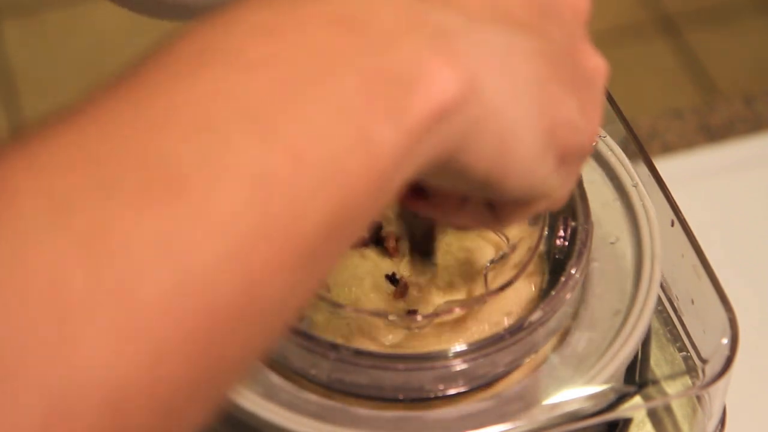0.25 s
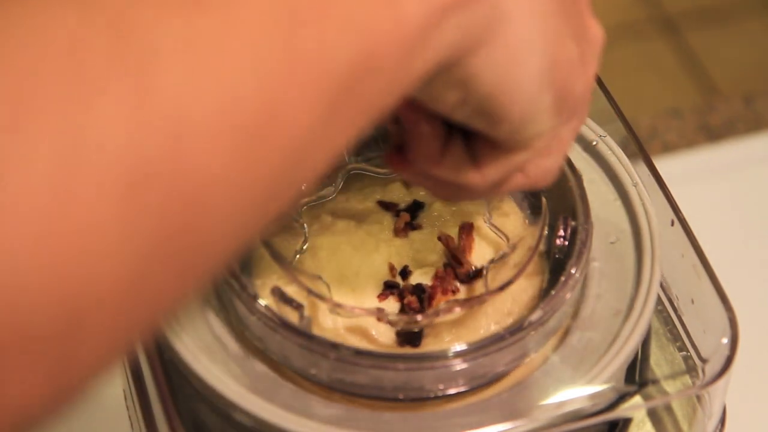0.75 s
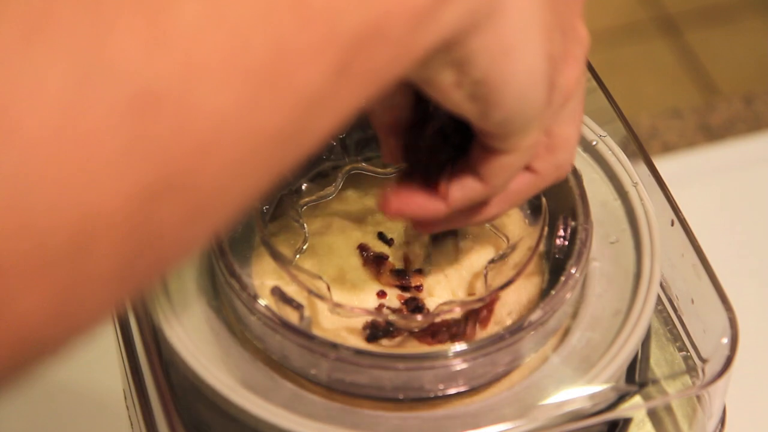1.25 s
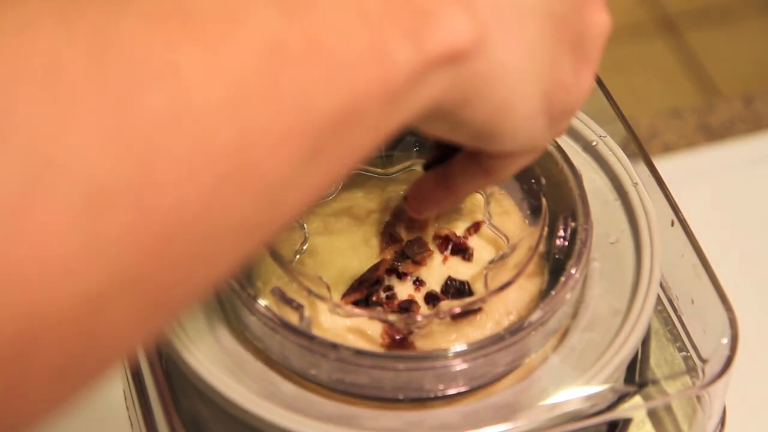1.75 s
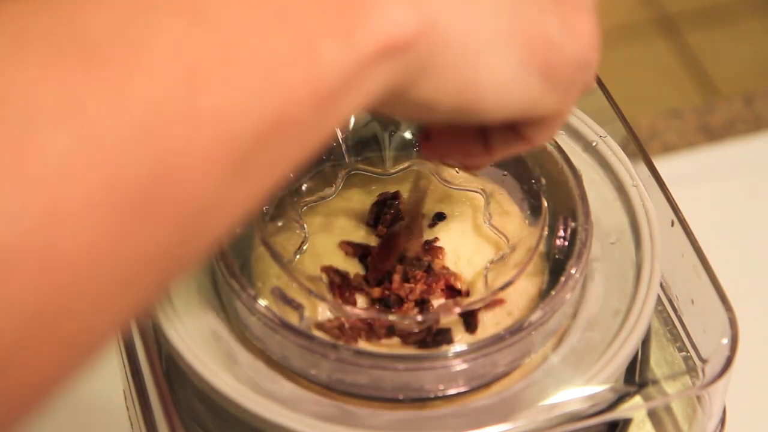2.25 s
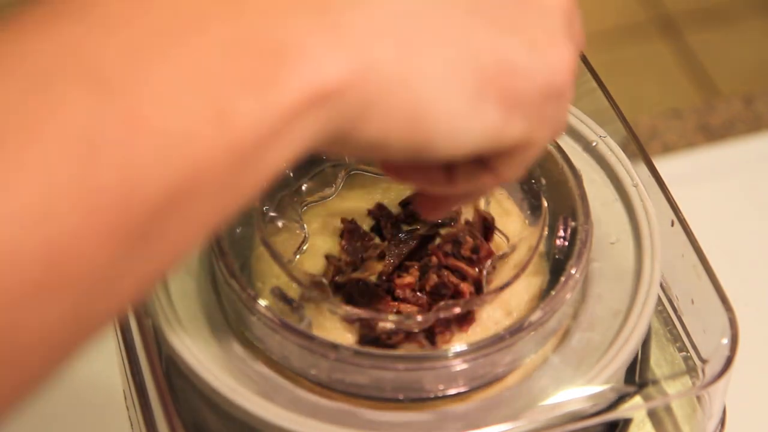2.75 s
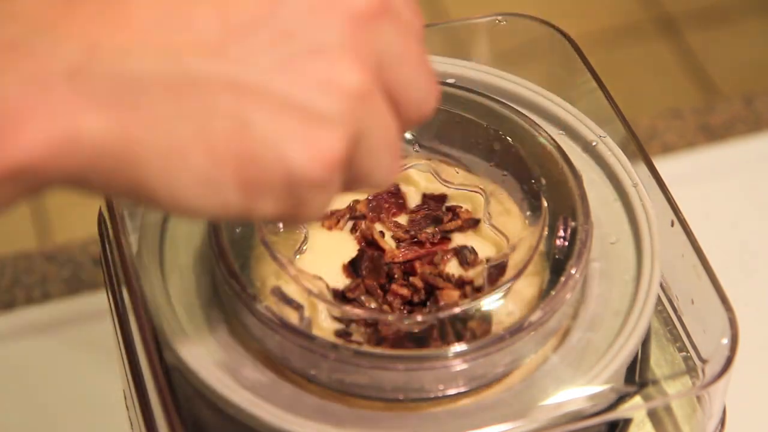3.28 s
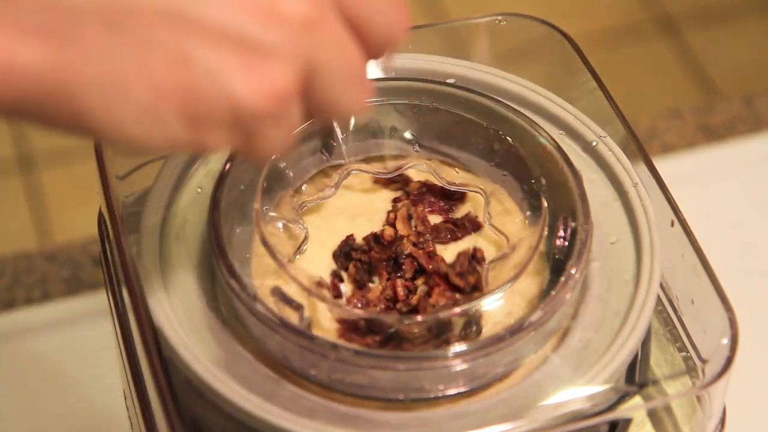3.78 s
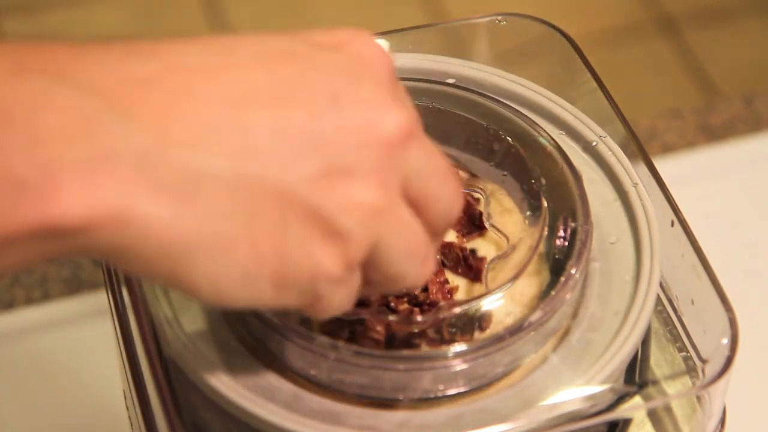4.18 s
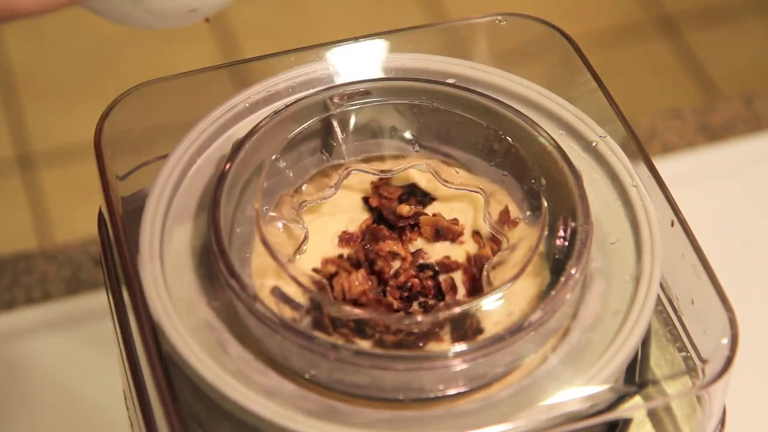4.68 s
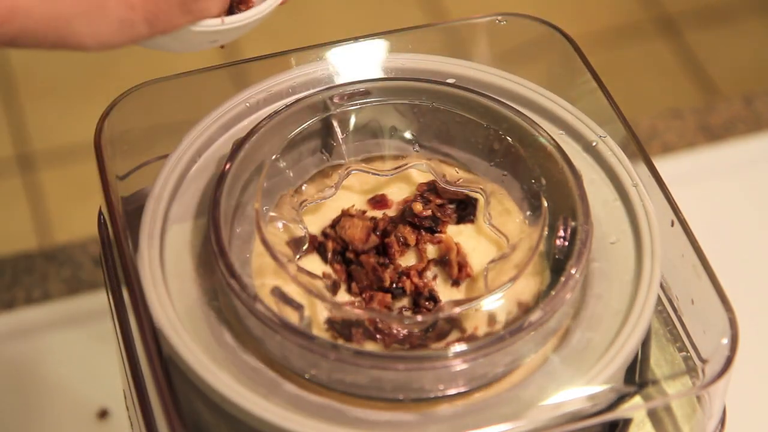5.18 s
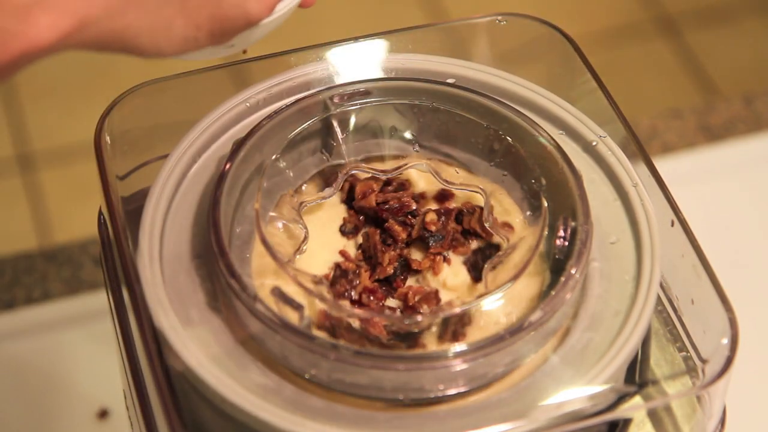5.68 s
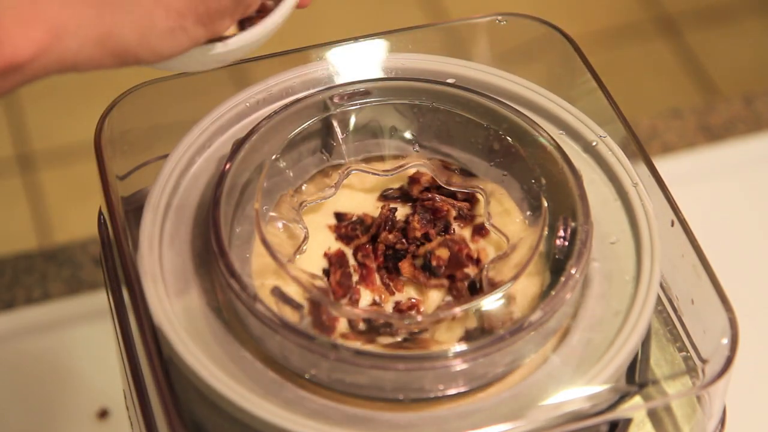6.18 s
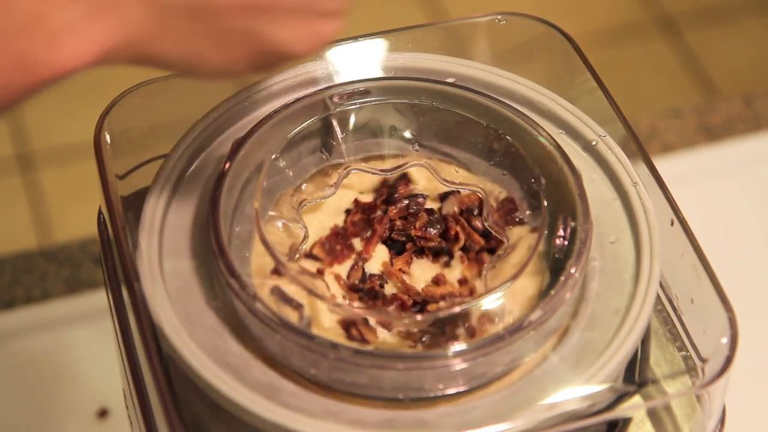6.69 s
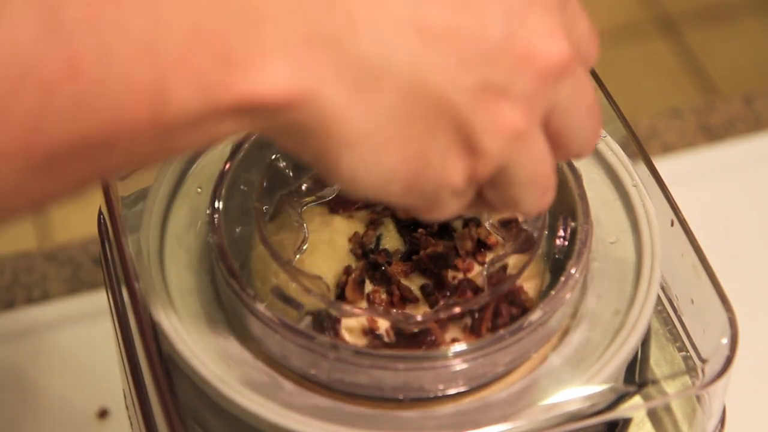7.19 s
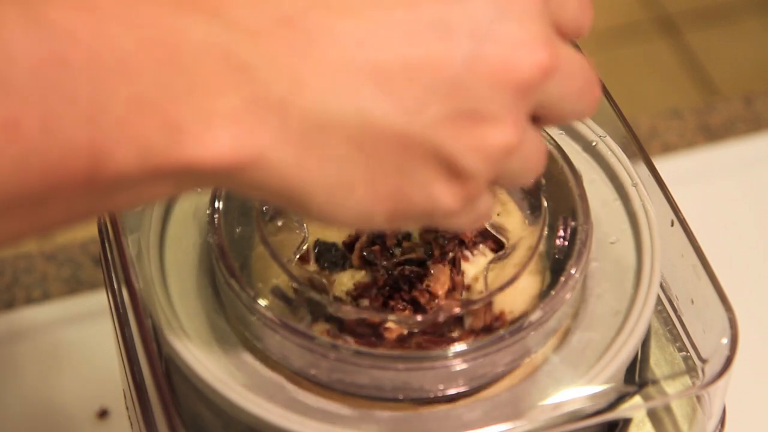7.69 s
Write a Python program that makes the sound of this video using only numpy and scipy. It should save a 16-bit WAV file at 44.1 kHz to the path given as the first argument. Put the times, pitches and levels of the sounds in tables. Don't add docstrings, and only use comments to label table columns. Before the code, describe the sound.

Steady whirring of a small churning machine heard close up indoors. The gear tone flutters slightly with wheel turns, while the plastic body buzzes and rattles. Fine hiss and irregular brittle ticks come from the frozen bowl. Soft low thuds pass about every two and a half seconds, each followed by a small catch in the whine. Crumbs patter once around the middle; the colour shifts subtly as something moves above.

```python
import sys
import numpy as np
from scipy import signal
from scipy.fft import rfft, irfft
from scipy.io import wavfile
from scipy.ndimage import uniform_filter1d

SR = 44100
rng = np.random.default_rng(int(sys.argv[2]) if len(sys.argv) > 2 else 0)


def boost(x):
    u = np.asarray(x, float) / 20
    return 10 ** u


def master(y):
    cut = np.clip(np.atleast_2d(y).T, -1, 1)
    pcm = np.round(cut * 32767)
    wavfile.write(sys.argv[1], SR, pcm.astype(np.int16))


N = 350154
T = np.arange(N) / SR
TEETH, PULL_HZ = 7, 120
MESH_HZ, WHEEL_HZ, BOWL_HZ = 396.68, 3.42, .425
# (level_db, db_per_unit_load)
WHINE, DRONE, RATTLE, SCRAPE = (-19.5, 0.73), (-20, -0.27), (-27.5, -0.39), (-42.5, -0.39)


def evened(x):
    return x / np.sqrt(np.mean(x ** 2) + 1e-20)


def cycle(turns):
    return np.cos(2 * np.pi * turns)


def slow(rate_hz):
    step = 64
    count = N // step + 2
    hz = np.fft.rfftfreq(count, step / SR)
    z = rfft(rng.standard_normal(count)) * np.exp(-(hz / rate_hz) ** 2)
    return np.interp(T, np.arange(count) * step / SR, evened(irfft(z, count)))


def patchwork(shape, frames, bins):
    over_time = uniform_filter1d(rng.standard_normal(shape), size=frames, axis=0)
    return evened(uniform_filter1d(over_time, size=bins, axis=1))


def colour(x, spectrum, rings):
    hz = np.fft.rfftfreq(16384, 1 / SR)
    f, db = np.transpose(spectrum)
    gain = boost(np.interp(np.log(hz + 1), np.log(f + 1), db))
    for centre, width, up_db in rings:
        hump = (boost(2 * up_db) - 1) / (1 + (2 * (hz - centre) / width) ** 2)
        gain = gain * np.sqrt(1 + hump)
    fold = irfft(np.log(np.maximum(gain, 1e-6)))
    fold[1:8192] *= 2
    fold[8193:] = 0
    return signal.oaconvolve(x, irfft(np.exp(rfft(fold)))[:8192])[:N]


def split(x, hz, kind):
    return signal.sosfilt(signal.butter(4, hz, kind, fs=SR, output="sos"), x)


# start_s, load [-1.2..1]
LOAD = [
    (0, 0.46),
    (1.3, 1),
    (2.8, 0.32),
    (3.6, -0.55),
    (4.6, -1.2),
    (5.5, -1.1),
    (6.7, -0.62),
    (7.94, 0.46),
]


def level(layer):
    base_db, db_per_load = layer
    load = np.interp(T, *np.transpose(LOAD))
    return boost(base_db + db_per_load * load)


# times_per_turn, swing_hz, start_turns
WOBBLE = [(1, .46, .06), (2, .4, 0), (3, .7, .575), (5, .45, .51), (6, .35, .98)]


def tooth_rate():
    rocking = sum(hz * cycle(k * WHEEL_HZ * T + start) for k, hz, start in WOBBLE)
    bowl_hz = .28 * cycle(BOWL_HZ * T + .06)
    catch_hz = -2.5 * catches()
    return MESH_HZ + rocking + bowl_hz + catch_hz


def tooth_level():
    wheel_db = .55 * cycle(2 * WHEEL_HZ * T + .36)
    bowl_db = .45 * cycle(BOWL_HZ * T - .25)
    catch_db = 3 * catches()
    return level(WHINE) * boost(wheel_db + bowl_db + catch_db)


# shaft_multiple, pull_multiple, level_db
TONES = [(1, 0, -59), (0, 1, -52), (7, -2, -55), (0, 2, -58), (5, 0, -57), (0, 3, -40), (0, 4, -45),
         (7, 1, -30), (12, -1, -37), (8, 1, -39), (13, -1, -39), (11, 0, -38), (7, 2, -37), (14, -1, -26),
         (13, 0, -35), (14, 0, -26), (15, 0, -33), (7, 4, -42), (18, -1, -42), (21, -2, -41), (18, 0, -42),
         (19, 0, -46), (17, 1, -50), (18, 1, -46), (21, 0, -47), (19, 1, -49), (18, 2, -52), (28, 1, -52),
         (42, -1, -45), (56, 0, -45),
         (23, 0, -50), (28, 0, -49), (35, 0, -53), (55, 0, -49), (57, 0, -47), (63, 0, -52)]


def whine(shaft, pull, waver_db=1.5, tones_db=0.2):
    out = tooth_level() * boost(0.59 * slow(36.0)) * cycle(TEETH * shaft)
    for order, pulls, db in TONES:
        waver = min(order, 7) / 7
        wander = 0.021 * order ** .5 * slow(3.1)
        loudness = boost(db + tones_db + waver * waver_db * slow(4.9))
        out += loudness * cycle(order * shaft + pulls * pull + rng.random() + wander)
    return np.sqrt(2) * out


# pitch_hz, level_db
FRIDGE = [(58.54, -61), (360.8, -44), (157.5, -56), (221.4, -52), (755.7, -40), (820.3, -43), (950.8, -44)]
BEAT_STARTS = [.14, .9]


def fridge():
    starts = [*BEAT_STARTS, *rng.random(5)]
    hums = sum(boost(db) * cycle(hz * T + start) for (hz, db), start in zip(FRIDGE, starts))
    return np.sqrt(2) * hums


# pitch_hz, density_db [dB per Hz]
HOUSING = [(30, -63), (90, -39), (170, -30.5), (260, -37.5), (420, -25), (510, -16), (680, -14.5),
           (850, -18), (1060, -27), (1400, -31), (1800, -29), (3000, -29.5), (5000, -40), (5600, -44.5),
           (7000, -81.5)]
# pitch_hz, width_hz, rise_db
PANELS = [(193.5, 33, 10), (288, 38, 6.5), (317, 15, -0.5), (356, 25, 7.5), (494, 17, 6), (560, 19, 5.5),
          (595, 31, -2), (678, 33, 8), (740, 21, 2), (809, 26, 4.5), (849, 14, 6), (953, 45, 5.5),
          (1395, 140, 7.5), (1576, 18, 9), (2226, 69, 8), (2265, 9.3, 7), (2300, 40, -13), (2566, 48, 6),
          (3215, 57, 11), (3378, 59, 8.5), (3545, 69, 5.5), (3828, 40, 10), (4050, 51, 15.5),
          (4256, 20, 10), (4480, 30, 11.5), (4703, 93, 10), (4947, 71, 12.5), (5245, 79, 7)]


def rattle(shaft, pull, repeat=0.47, loose=0.94, rub=0.72, burst_db=1.2, pinion=0.52):
    teeth = TEETH * shaft + 0.16 * cycle(pull)
    at = np.flatnonzero(np.diff(np.floor(teeth)) > 0)
    knocks, turns = np.zeros((2, N))
    around = TEETH * 17
    wheel = rng.standard_normal(around)[np.arange(len(at)) % around]
    knocks[at] = repeat * wheel + loose * rng.standard_normal(len(at))
    sliding = rng.standard_normal(N) * (1 + 0.39 * cycle(teeth)) * (1 + 0.7 * cycle(pull))
    body = colour(evened(knocks) + rub * sliding, HOUSING, PANELS)
    drone = split(body, 1384, "low")
    drone = drone / np.std(split(drone, 620, "high"))
    drone = drone * level(DRONE) * boost(-6.0 + 1.1 * slow(2.7))

    turns[np.flatnonzero(np.diff(np.floor(shaft + .004 * slow(6.))) > 0)] = 1
    spread = evened(rng.standard_normal(700)) / np.sqrt(700)
    smear = signal.oaconvolve(evened(turns), spread)[:N]
    chatter = rng.standard_normal(N) * (1 + .2 * cycle(teeth)) * boost(burst_db * slow(50.))
    chatter = chatter * (1 + .09 * cycle(6 * WHEEL_HZ * T - .46))
    panels = split(colour(chatter + pinion * smear, HOUSING, PANELS), 1350, "high")
    return drone + evened(panels) * level(RATTLE) * boost(-0.54)


# start_s, arm_low [-1..1.1], dish_beside [0..1]
NEAR = [(0, 0.59, 0.6), (.5, 0.8, .9), (.9, 0.48, 0), (1.6, 1.06, 0), (2.1, 1.1, 0), (2.7, 0.94, 0.2),
        (3.1, .2, 0), (3.5, -0.41, 0), (4.5, -0.33, 0.1), (5, -0.96, 0.38), (6, -0.36, 0.16),
        (6.5, -0.78, 0.26), (7.94, -0.65, 0)]
# pitch_hz, change_db
ARM_TINT = [(565, 0.5), (630, 0.5), (740, -2.5), (790, 2.5), (1000, 1), (1200, 0), (1600, 0), (2230, 1),
            (2560, -1), (3000, -1), (3170, 2), (3550, -0.5), (4300, -1), (5300, 1)]
# pitch_hz, change_db
DISH_TINT = [(600, 0), (740, 3), (793, -6.5), (850, 1), (1000, 2), (1190, -1), (1600, -1.5), (2230, 2.5),
             (2800, -2.5), (3250, -5.5), (3700, 1), (4500, 1.5)]


def shaded(x, flicker_db=1.2):
    hz, t, z = signal.stft(x, SR, nperseg=4096)
    start_s, arm, dish = np.transpose(NEAR)
    db = flicker_db * patchwork(z.T.shape, 4, 12).T * (hz > 1250)[:, None]
    for tint, near in ((ARM_TINT, arm), (DISH_TINT, dish)):
        pitch_hz, change_db = np.transpose(tint)
        tint_db = np.interp(np.log(hz + 1), np.log(pitch_hz), change_db)
        db = db + np.outer(tint_db, np.interp(t, start_s, near))
    return signal.istft(z * boost(db), SR, nperseg=4096)[1][:N]


# pitch_hz, density_db [dB per Hz]
HISS = [(4000, -30), (5400, 0), (6500, -1), (8000, -4.5), (10000, -6), (12000, -6.5), (13500, -8),
        (14500, -11.5), (15700, -16)]
# pitch_hz, width_hz, rise_db
HISS_RINGS = [(5805, 60, 6), (6280, 100, 4.5), (7330, 60, 3), (7700, 200, 4), (10360, 170, 7)]
# pitch_hz, change_db
HISS_TINT = [(5700, 1), (6100, -.6), (6500, 1), (7600, -1.5), (8250, 0), (9600, -0.5), (11000, -1),
             (13500, 0)]


def scrape(shaft, pull, grains_per_s=90., spread_db=0.0, grain_share=0.47, patch_db=0.5):
    throb = (1 + 0.11 * cycle(pull)) * (1 + .12 * cycle(TEETH * shaft)) * (1 + .07 * cycle(shaft))
    throb = throb * (1 + .09 * cycle(6 * WHEEL_HZ * T - .29)) * boost(1.5 * slow(45.))
    sizes = boost(spread_db * np.minimum(rng.exponential(1, N), 3))
    sizes = sizes * (rng.random(N) < grains_per_s / SR)
    fade_s = 0.0038
    grains = signal.lfilter([1], [1, -np.exp(-1 / (fade_s * SR))], sizes) * rng.standard_normal(N)
    grains = split(grains, 7200, "high")
    source = throb * rng.standard_normal(N) + grain_share * evened(grains)
    hiss = colour(source, HISS, HISS_RINGS)
    hz, t, z = signal.stft(hiss, SR, nperseg=256)
    patches = patchwork(z.T.shape, 6, 14).T
    arm = np.interp(t, *np.transpose(NEAR)[:2])
    arm_db = np.outer(np.interp(hz, *np.transpose(HISS_TINT)), arm)
    hiss = signal.istft(z * boost(patch_db * patches + arm_db), SR, nperseg=256)[1][:N]
    return evened(hiss) * level(SCRAPE) * boost(-0.34)


# start_s, peak_db
TICKS = [(0.5836, -32), (0.9188, -36), (1.1243, -39), (1.4177, -30), (1.5599, -31), (1.5933, -35),
         (1.7519, -32), (1.9999, -38), (2.2253, -33), (2.4024, -31), (2.5341, -36), (2.5845, -38),
         (2.9836, -31), (3.0603, -29), (3.1248, -36), (3.3189, -38), (3.3648, -37), (3.6466, -38),
         (4.5306, -37), (4.8304, -37), (4.8768, -33), (5.036, -30), (5.2614, -36), (5.461, -34),
         (5.7942, -31), (6.095, -36), (6.2901, -36), (6.8598, -39), (7.2604, -38), (7.8366, -32)]


def ticks(t60=0.031):
    faint_per_s, faint_db = 3, -40
    low_db, low_share = -43.5, .3
    top, low = np.zeros((2, N))
    faint = np.flatnonzero(rng.random(N) < faint_per_s / SR) / SR
    for s, db in [*TICKS, *[(s, faint_db) for s in faint]]:
        i = round(s * SR)
        top[i] = boost(db)
        low[i] = boost(low_db + low_share * (db + 35))
    fade = [1, -boost(-60 / (t60 * SR))]
    noise = rng.choice([-1., 1.], (2, N))
    bright = split(signal.lfilter([1], fade, top) * noise[0], 14000, "high")
    bright = split(bright, 14400, "low")
    lower = split(signal.lfilter([1], fade, low) * noise[1], 7000, "high")
    lower = split(lower, 11500, "low")
    return 2.1 * bright + 2.2 * lower


# start_s, level_db
BUMPS = [
    (1.08, -39),
    (3.48, -44),
    (5.88, -43),
]


def bumps(low_hz=90., high_hz=220., length=.04):
    shape = sum(boost(db) * np.exp(-((T - s) / length) ** 2) for s, db in BUMPS)
    thud = split(split(rng.standard_normal(N), low_hz, "high"), high_hz, "low")
    return shape * evened(thud)


# start_s, strength [0..1.1]
CATCHES = [
    (1.235, 0.9),
    (3.605, 1.07),
    (5.96, .3),
]


def catches():
    length_s = .025
    return sum(size * np.exp(-((T - s) / length_s) ** 2) for s, size in CATCHES)


# start_s, level_db, length_s
CRUMBS = [
    (3.365, -40, .02),
    (3.391, -28, .015),
    (3.415, -25.5, .03),
    (3.428, -46, .03),
]


def crumbs():
    shape = 0
    for s, db, length in CRUMBS:
        shape = shape + boost(db) * np.exp(-abs(T - s) / np.where(T < s, .003, length))
    noise = split(rng.standard_normal(N), 1140, "high")
    return shape * (split(noise, 3300, "low") * 2.6 + 0.45 * noise)


def scene():
    shaft = np.cumsum(tooth_rate()) / (TEETH * SR)
    pull = PULL_HZ * T
    motor = shaded(whine(shaft, pull) + fridge() + rattle(shaft, pull))
    return (motor + scrape(shaft, pull) + ticks() + bumps() + crumbs())[None]


def top_cut(x):
    return signal.sosfilt(signal.butter(12, 15650, fs=SR, output="sos"), x)


def record(dry):
    return top_cut(dry)


dry = scene()
out = record(dry)
master(out)
```